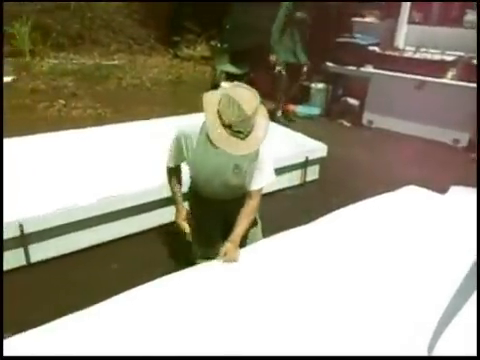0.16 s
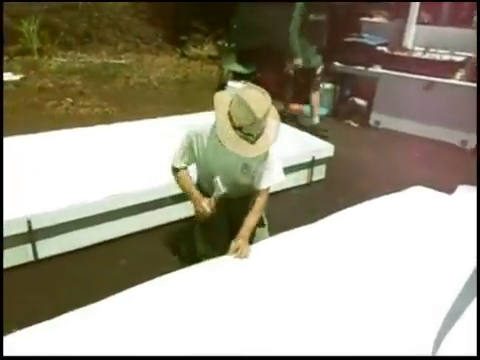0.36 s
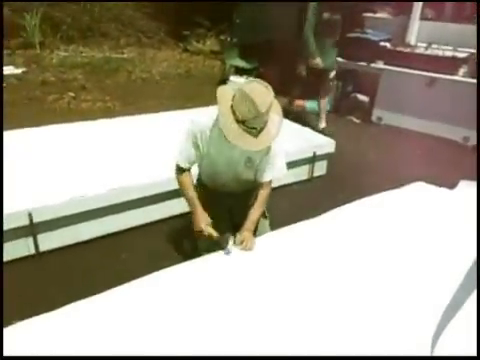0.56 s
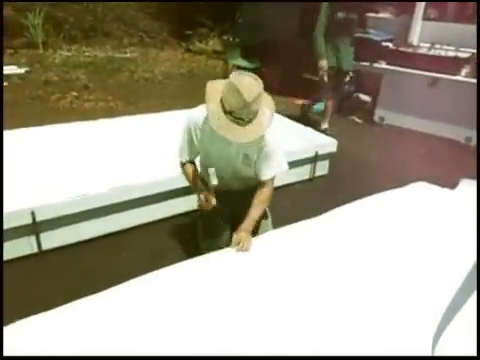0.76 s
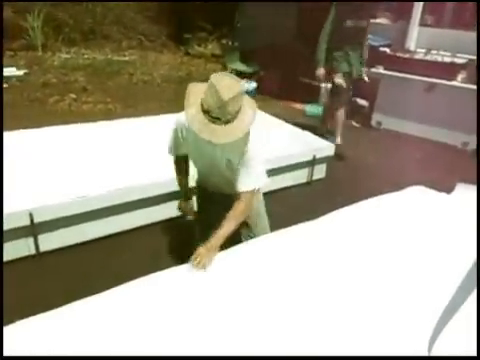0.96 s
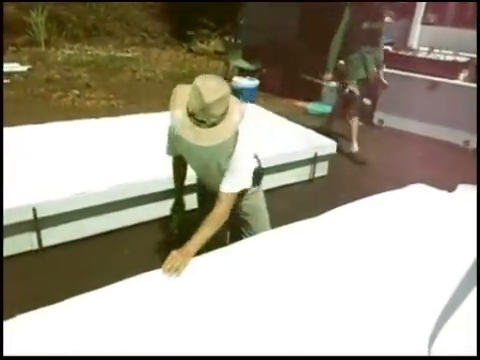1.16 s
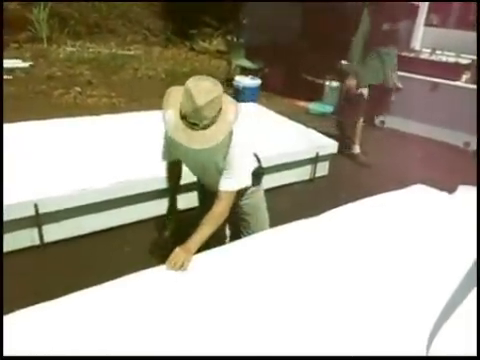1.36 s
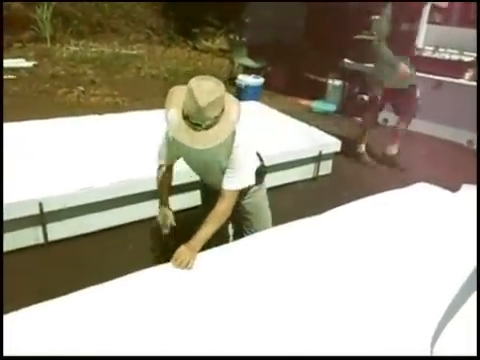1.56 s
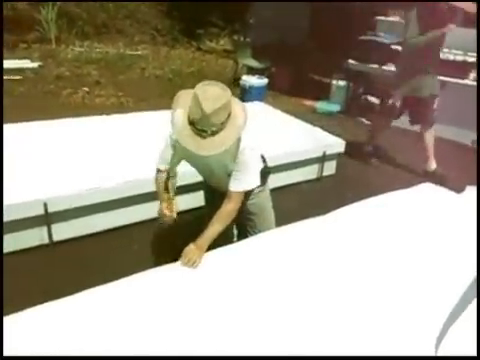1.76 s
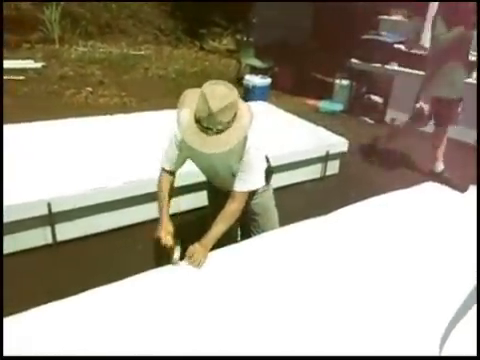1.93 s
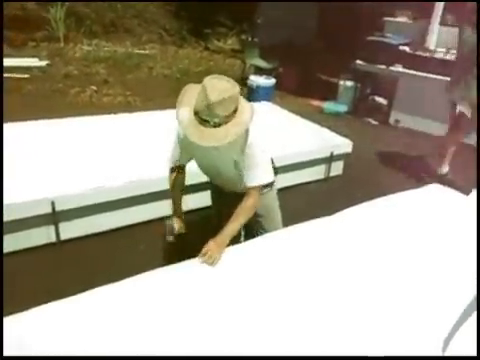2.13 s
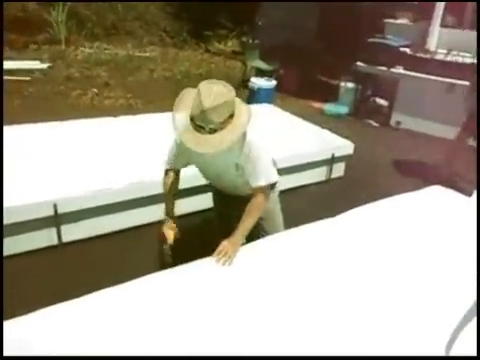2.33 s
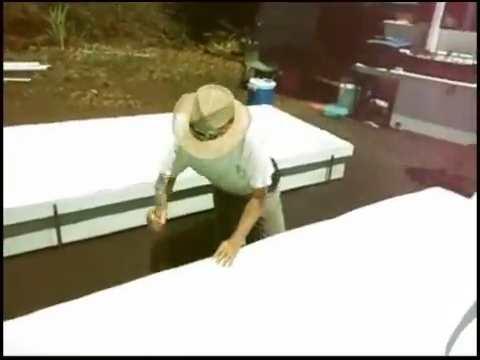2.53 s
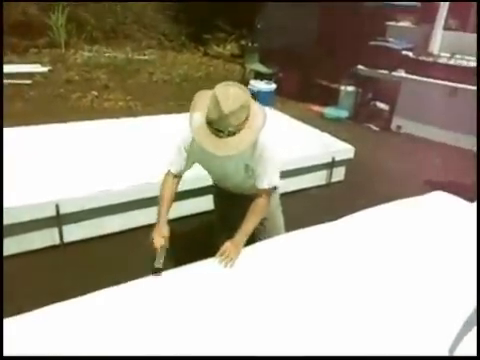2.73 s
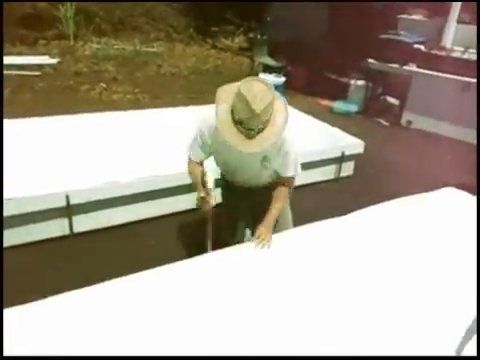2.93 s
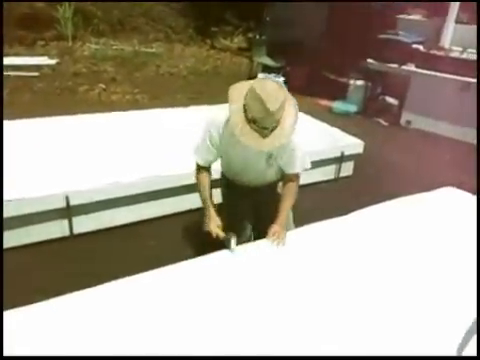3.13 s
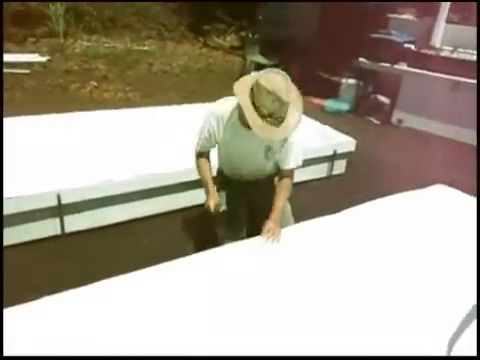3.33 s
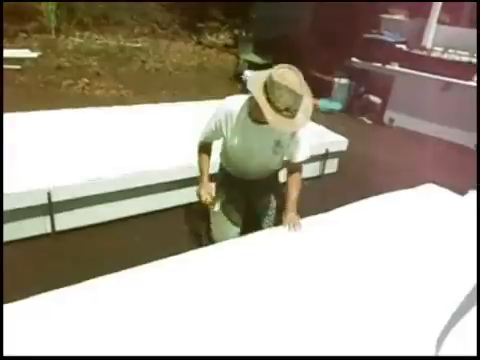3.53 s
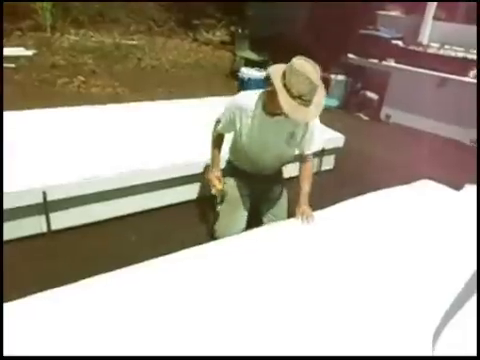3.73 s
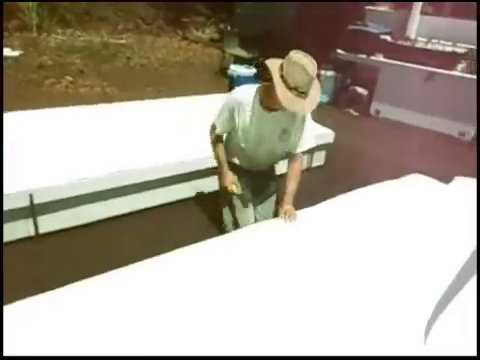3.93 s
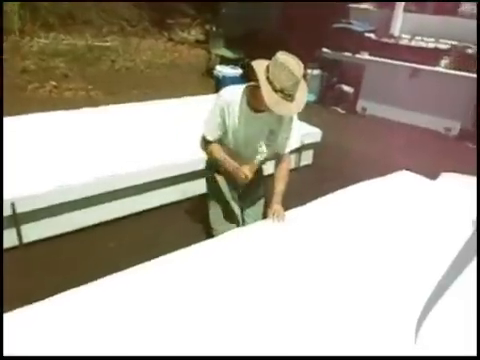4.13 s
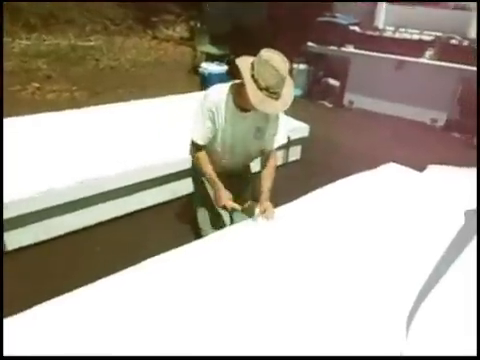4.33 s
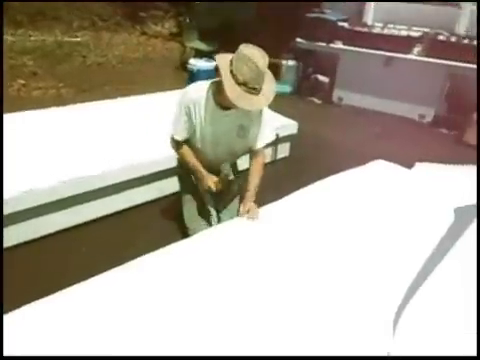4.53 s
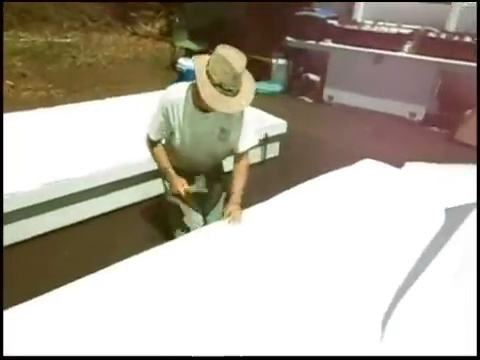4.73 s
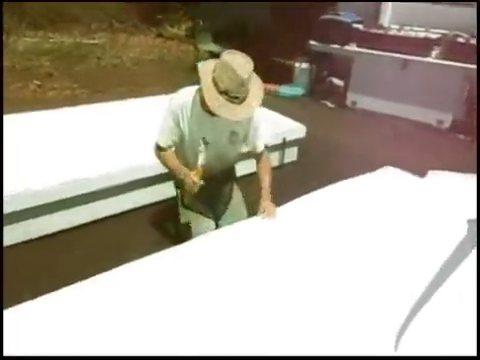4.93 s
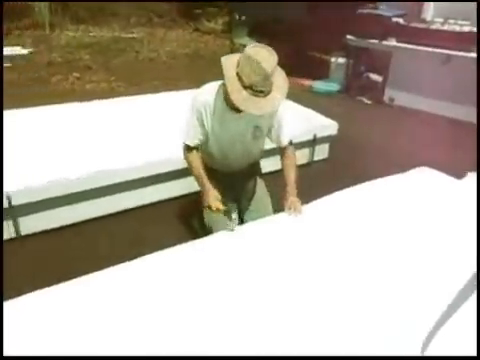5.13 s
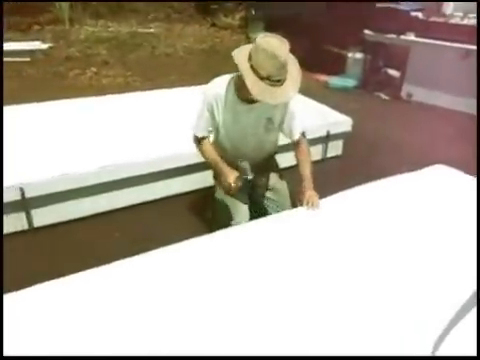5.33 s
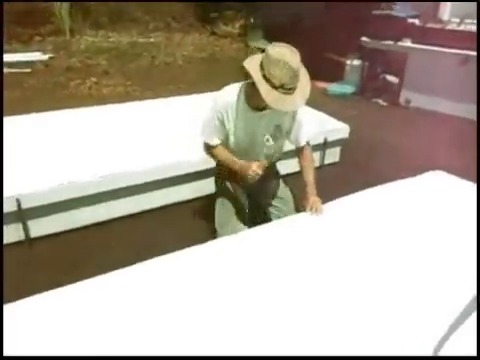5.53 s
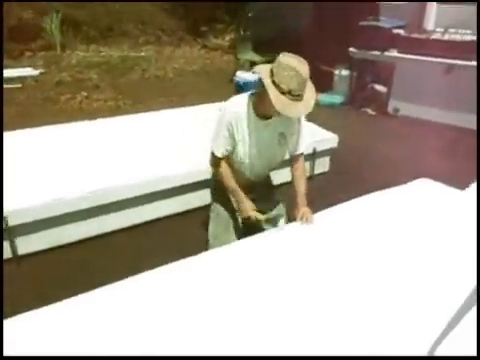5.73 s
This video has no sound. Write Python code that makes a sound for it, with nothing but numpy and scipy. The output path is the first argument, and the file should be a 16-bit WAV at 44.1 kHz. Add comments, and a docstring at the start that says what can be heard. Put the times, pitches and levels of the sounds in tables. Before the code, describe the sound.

In an open yard, gusty wind rumbles on a small, narrow-sounding microphone over a faint hiss. A staple gun fires six unevenly spaced shots through plastic sheeting into a wooden edge. Each is a sharp crack with a brief steel ring and a wooden thump, followed by a smaller spring clack. Between shots, loose metal parts tick and the sheet rustles faintly. Two short rasps come near the end.

```python
"""Wind buffets a small, narrow-band microphone in an open yard, over a faint hiss.
A staple gun then fires six times through plastic sheeting into a wooden edge.
Each shot: the driver cracks, the steel rings, the wood thumps; a smaller clack as the tool springs back.
Between shots, loose metal parts tick and the sheet rustles.
Two short swelling rasps: the tool rattles into a spring clack; the sheet slides before the last shot."""
import sys
import numpy as np
from scipy import signal
from scipy.fft import rfft, irfft
from scipy.io import wavfile
from scipy.ndimage import uniform_filter1d

SR = 44100
rng = np.random.default_rng(int(sys.argv[2]) if len(sys.argv) > 2 else 0)


def pcm_store(signal):
    """Save signal as 16-bit PCM."""
    levels = np.round(np.clip(np.atleast_2d(signal), -1, 1) * 32767)
    wavfile.write(sys.argv[1], SR, levels.astype(np.int16).T)


N = 254898

# Noise spectra (frequency [Hz], relative density [dB])
AIR_SPECTRUM = [(25, -0.5), (60, -8.5), (130, -7), (270, -0.5), (350, 3.5), (480, -1.5), (600, -2.5),
                (950, -4), (1400, -10.5), (2600, -14), (4000, -8.5), (5200, -13), (6400, -23), (7200, -44),
                (9000, -65)]
RUSTLE_SPECTRUM = [(200, -35), (700, 2.5), (1400, -3), (2600, 0.5), (4200, 0), (5500, -8), (7000, -19.5),
                   (9000, -35)]
WIND_SPECTRUM = [(30, -32), (60, -37.5), (100, -8), (135, 3.5), (210, 4), (300, 1.5), (420, -13.5),
                 (600, -21), (900, -40.5), (1500, -91)]
RASP_SPECTRUM = [(300, -11), (900, -2.5), (1500, -3), (2700, -1.5), (4200, -3), (5500, -11.5),
                 (7000, -19.5), (9000, -35)]
SOFT_CONTACT_SPECTRUM = [(800, -21), (2500, 6.5), (6500, -3), (8500, -22)]
CLICK_SPECTRUM = [(300, -6.5), (1200, -2.5), (4000, -23), (7000, -5), (12000, 1.5)]
CHATTER_SPECTRUM = [(150, -6), (500, -3.5), (1100, -3.5), (1800, -3), (2500, 3.5), (3200, 0.5), (4300, -3),
                    (5500, -16), (7000, -18), (9000, -33.5)]
CRACK_SPECTRUM = [(100, -30.5), (300, -22), (520, 6), (800, 3), (1150, 7), (1600, 0), (2000, 1.5),
                  (2500, 1.5), (3400, -1.5), (4800, -6), (5600, -11.5), (6600, -17), (7500, -19),
                  (9000, -33)]
YARD_TAIL_SPECTRUM = [(150, -2), (500, 7), (1200, -2), (2600, 1.5), (4200, -1), (5500, -6), (7000, -17.5),
                      (9000, -29.5)]

# Contour driving yard hiss and sheet rustle (time [s], relative level [dB])
BACKGROUND_SWELL = [(0.0, -58), (0.61, -50), (1.17, -64.5), (1.22, -59.5), (1.44, -66), (2.05, -53),
                    (2.34, -56.5), (2.55, -69.1), (3.12, -55), (4.05, -57.5), (4.23, -62.5), (4.33, -56),
                    (4.5, -53.5), (5.77, -60)]
# Wind strength (time [s], level [dB])
WIND_STRENGTH = [(0.0, -61), (0.09, -36.5), (0.46, -39), (0.62, -31), (0.76, -35), (0.81, -40.5),
                 (1.42, -41.5), (1.49, -33), (2.81, -32.5), (3.12, -50), (3.4, -31.5), (3.72, -57.5),
                 (4.23, -60.5), (4.66, -39), (4.91, -54.8), (4.96, -34), (5.1, -37), (5.15, -43.5),
                 (5.22, -40), (5.62, -57), (5.67, -39.5), (5.77, -50)]
# Strongest eddies (centre time [s], peak [dB], nominal pitch [Hz])
STRONG_EDDIES = [(0.091, -18.5, 250), (0.103, -20.5, 195), (0.42, -16, 285), (0.445, -18, 287),
                 (0.52, -20, 230), (0.612, -15.5, 290), (0.773, -22.5, 233), (0.958, -15, 264),
                 (0.974, -19, 215), (1.207, -19.5, 196), (1.341, -31.5, 333), (1.626, -26, 450),
                 (1.632, -18.5, 242), (1.771, -16, 332), (1.78, -13, 265), (1.841, -18.5, 304),
                 (1.871, -16, 323), (1.928, -24, 392), (1.932, -13.5, 199), (2.13, -16, 235),
                 (2.19, -18.5, 200), (2.213, -16.5, 220), (2.444, -21.5, 346), (2.699, -18, 292),
                 (2.872, -19.5, 218), (3.028, -19, 232), (3.142, -19.5, 201), (3.497, -19.5, 265),
                 (4.683, -15, 186), (4.958, -27.5, 206), (4.985, -24, 220)]
# Rasps: tool rattle, then sheet slide (loudest time [s], level [dB], swell [s])
RASPS = [(4.484, -36, .03), (5.125, -35, .068)]
# Resonances of the loose parts (frequency [Hz], width [Hz], relative level [dB])
LOOSE_RESONANCES = [(2836, 220, -3), (4660, 460, 4.5), (4810, 140, -8), (5870, 260, -4)]
# Loose parts touch (time [s], peak [dB])
TICKS = [(0.5212, -40.5), (1.043, -38.5), (1.674, -47.5), (1.863, -36.5), (2.3293, -42.5), (2.6513, -48),
         (2.9717, -37), (3.094, -33.5), (3.708, -44), (4.3095, -41.5), (4.712, -42), (4.7654, -38),
         (5.3493, -41), (5.4918, -45.5), (5.665, -40.5)]
# Modes of tool and wooden edge (base frequency [Hz], relative level [dB], t60 before envelope [s])
STEEL_MODES = [(1630, -9.5, 0.032), (1720, -1.5, 0.057), (2390, -1, 0.075), (2528, 11, 0.029),
               (2850, -12, 0.061), (3055, 1.5, 0.047), (3350, -27, 0.038), (4220, -11.5, 0.13),
               (4130, -25, 0.041), (4950, 8, 0.029)]
WOOD_MODES = [(131.3, -19.5, 0.29), (198.8, -11, 0.26), (259, -8.5, 0.13), (310.8, -1, 0.099),
              (368, -17.5, 0.15), (452.6, -20, 0.17), (649, -12.5, 0.069), (1360, -16, 0.018)]
# Spring returns (time [s], level [dB], rise [s], click level [dB], low ring [Hz], high ring [Hz])
CLACKS = [(0.698, -24, 0.014, -51, 2710, 3120), (2.046, -37.5, .01, -54, 2470, 2730),
          (2.837, -35, 0.0023, -31, 1237, 2350), (3.293, -31, 0.015, -36, 1930, 2350),
          (4.4985, -29, 0.0019, -24, 2710, 3940), (5.228, -27, 0.0013, -23.5, 1730, 2485)]
# Staples; each spot on the edge has its own two knock pitches (time [s], level [dB], crack tilt [dB/oct],
# thump level [dB], wood pitch [ratio], low knock [Hz], high knock [Hz], knock level [dB])
SHOTS = [(0.6446, -15.5, 0.5, -7, 1.07, 1117, 1893, -22), (1.9805, -15, 0, -5.5, 0.99, 817, 1077, -14),
         (2.7671, -16.5, 0.5, -5, 1.024, 794, 1250, -15), (3.2410, -16, -0.7, -7, 1.017, 1298, 1804, -19.5),
         (4.4298, -15.5, 0.5, -7.5, 1.0, 979, 1270, -22), (5.165, -15.5, 1, -5, 1.04, 1088, 1602, -18)]


def amp(db):
    """Decibels to gain."""
    return 10 ** (np.asarray(db) / 20)


def unit_rms(x):
    """Scale to rms 1."""
    return x / np.sqrt(np.mean(x ** 2) + 1e-20)


def curve(rows):
    """Linear interpolation of (time [s], value) rows."""
    return np.interp(np.arange(N) / SR, *np.transpose(rows))


def add(mix, start_s, sound):
    """Mix a sound in at start_s."""
    part = mix[max(round(start_s * SR), 0):][:len(sound)]
    part += sound[:len(part)]


def noise(spectrum, size, tilt_db_oct=0):
    """Random-phase noise of a given spectrum, rms 1."""
    octave = np.log2(np.fft.rfftfreq(size, 1 / SR) + 1)
    hz, db = np.transpose(spectrum)
    gain = amp(np.interp(octave, np.log2(hz), db) + tilt_db_oct * octave)
    return unit_rms(irfft(gain * np.exp(2j * np.pi * rng.random(len(gain))), size))


def wander(rate_hz):
    """Low-passed random drift, rms 1."""
    hz = np.fft.rfftfreq(N, 1 / SR)
    return unit_rms(irfft(rfft(rng.standard_normal(N)) * np.exp(-(hz / rate_hz) ** 2), N))


def patchy(x, depth_db):
    """Colour drift in patches of about 600 Hz by 0.14 s."""
    frames = signal.stft(x, nperseg=512)[2]
    field = uniform_filter1d(rng.standard_normal(frames.shape), size=7, axis=0)
    field = uniform_filter1d(field, size=24, axis=1)
    return unit_rms(signal.istft(frames * amp(depth_db * unit_rms(field)))[1][:N])


def ragged(x, peak_db, spacing_hz=110):
    """Many close resonances: random spectral peaks and deeper dips."""
    hz = np.fft.rfftfreq(len(x), 1 / SR)
    knots_hz = np.arange(0, SR, spacing_hz)
    ripple_db = peak_db * np.interp(hz, knots_hz, rng.uniform(-2.8, 1, len(knots_hz)))
    return unit_rms(irfft(rfft(x) * amp(ripple_db), len(x)))


def ring(modes, t, pitch=1):
    """Struck body: decaying sines from (frequency [Hz], level [dB], t60 [s]) rows."""
    return sum(amp(db - 60 * t / t60_s) * np.sin(2 * np.pi * (hz * pitch * t + rng.random()))
               for hz, db, t60_s in modes)


def envelope(t, rise_s, hold_s, t60_s):
    """Linear rise; exponential decay from t = hold_s."""
    return np.clip(t / rise_s, 0, 1) * amp(-60 * np.maximum(t - hold_s, 0) / t60_s)


def yard_air(swell_db):
    """Distant hiss of the yard, drifting in level and colour."""
    level_db = -57.5 + 0.5 * swell_db + 0.5 * wander(rate_hz=4)
    return amp(level_db) * patchy(noise(AIR_SPECTRUM, N), depth_db=2)


def sheet_rustle(swell_db):
    """The plastic rustles unevenly and shivers after each shot."""
    t = np.arange(N) / SR
    shiver = sum(amp(db - 36) * envelope(t - time_s, rise_s=0.01, hold_s=0.024, t60_s=0.36)
                 for time_s, db, *_ in SHOTS)
    stir = np.hypot(amp(-62.5 + 1.44 * swell_db), shiver)
    flicker = amp(2.1 * wander(rate_hz=160))
    return stir * flicker * patchy(noise(RUSTLE_SPECTRUM, N), depth_db=2)


def wind_rumble(puff_db=-17.5, puff_half_width_s=0.02):
    """Lumpy turbulence, puffing up around each strong eddy; stronger gusts reach higher in pitch."""
    t = np.arange(N) / SR
    puff_power = sum(amp(db + puff_db) ** 2 * np.exp(-((t - time_s) / puff_half_width_s) ** 2)
                     for time_s, db, _ in STRONG_EDDIES)
    power = amp(curve(WIND_STRENGTH)) ** 2 + puff_power
    level_db = 10 * np.log10(power) - 1 + 2.45 * wander(rate_hz=52)
    bright_share = np.clip((level_db + 39.5) / 16, 0, 1)
    dull = np.sqrt(1 - bright_share) * noise(WIND_SPECTRUM, N, tilt_db_oct=-6.5)
    bright = np.sqrt(bright_share) * noise(WIND_SPECTRUM, N, tilt_db_oct=4)
    return amp(level_db) * (dull + bright)


def small_eddies(rate_per_s=14, centre_hz=267, spread_oct=0.25):
    """Random eddies, scaled by the wind that carries them; columns as STRONG_EDDIES."""
    gap, size, pitch = rng.standard_normal((3, 2000))
    elapsed = np.cumsum(abs(gap))
    time_s = elapsed / elapsed[-1] * len(gap) / rate_per_s
    peak_db = np.interp(time_s, *np.transpose(WIND_STRENGTH)) + 7 + 0.45 * size
    hz = centre_hz * 2 ** (spread_oct * np.clip(pitch, -2, 2))
    return np.transpose([time_s, peak_db, hz])[time_s < N / SR]


def eddy_buffets():
    """One brief push per eddy; the microphone passes no deep bass, so it swings back."""
    out, t = np.zeros(N), np.arange(-SR // 30, SR // 30) / SR
    lead_s = len(t) / (2 * SR) + 0.001
    for time_s, peak_db, hz in [*STRONG_EDDIES, *small_eddies()]:
        push = rng.choice([-1, 1]) / (1 + (hz * t / 0.32) ** 2)
        swing = signal.sosfilt(signal.butter(5, 0.8 * hz, "highpass", fs=SR, output="sos"), push)
        add(out, time_s - lead_s, amp(peak_db) * swing / abs(swing).max())
    return out


def rasps(growth_db=15):
    """Short swelling rasps: the tool rattles into a spring clack; the sheet slides before the last shot."""
    out, t = np.zeros(N), np.arange(SR // 3) / SR
    for time_s, db, swell_s in RASPS:
        growth = amp(growth_db * np.minimum(t / swell_s - 1, 0))
        rasp = noise(RASP_SPECTRUM, len(t)) * envelope(t, rise_s=0.006, hold_s=swell_s, t60_s=0.14)
        add(out, time_s - swell_s, amp(db) * growth * rasp)
    return out


def tool_ticks(scatter_db=3):
    """Loose metal parts rattle in broad resonances, in a new mixture at each touch."""
    out, t = np.zeros(N), np.arange(SR // 6) / SR
    hz = np.fft.rfftfreq(len(t), 1 / SR)
    for time_s, peak_db in TICKS:
        body = sum(amp(db + scatter_db * rng.standard_normal()) / (1 + 2j * (hz - centre_hz) / width_hz)
                   for centre_hz, width_hz, db in LOOSE_RESONANCES)
        rattle = irfft(body * rfft(noise(SOFT_CONTACT_SPECTRUM, len(t))), len(t))
        rattle *= envelope(t, rise_s=0.0011, hold_s=0.0016, t60_s=0.06)
        add(out, time_s, amp(peak_db) * rattle / abs(rattle).max())
    return out


def spring_clacks():
    """The spring throws the driver back: click, chatter, ringing parts and a bump on the wood."""
    out, t = np.zeros(N), np.arange(SR // 3) / SR
    for time_s, db, rise_s, click_db, low_hz, high_hz in CLACKS:
        chatter = ragged(noise(CHATTER_SPECTRUM, len(t)), peak_db=2)
        chatter *= envelope(t, rise_s, hold_s=0.0028, t60_s=0.13)
        steel = ring(STEEL_MODES, t) * envelope(t, rise_s, hold_s=0.02, t60_s=1.5)
        parts = ring([(low_hz, -1, 0.13), (high_hz, 0, 0.14)], t)
        parts *= envelope(t, rise_s=0.011, hold_s=0.03, t60_s=1.5)
        bump = ring(WOOD_MODES, t) * envelope(t, rise_s=0.014, hold_s=0.03, t60_s=0.58)
        click = noise(CLICK_SPECTRUM, len(t)) * envelope(t, rise_s=0.0003, hold_s=0.00074, t60_s=0.021)
        clack = chatter + amp(-10.5) * steel + amp(-6.5) * parts + amp(9) * bump
        add(out, time_s, amp(db) * clack + amp(click_db) * click)
    return out


def staple_shots(wood_lag_s=0.00515):
    """The driver snaps and cracks, steel rings, the yard answers; the heavy wood swings up later."""
    out, t = np.zeros(N), np.arange(SR // 2) / SR
    for time_s, db, tilt_db_oct, thump_db, wood_pitch, low_hz, high_hz, knock_db in SHOTS:
        crack = ragged(noise(CRACK_SPECTRUM, len(t), tilt_db_oct), peak_db=4.5)
        crack *= envelope(t, rise_s=0.0011, hold_s=0.0066, t60_s=0.092)
        steel = ring(STEEL_MODES, t) * envelope(t, rise_s=0.00092, hold_s=0.01, t60_s=1.5)
        yard = noise(YARD_TAIL_SPECTRUM, len(t)) * envelope(t, rise_s=0.017, hold_s=0.02, t60_s=0.57)
        snap = noise(CLICK_SPECTRUM, len(t)) * envelope(t, rise_s=0.00036, hold_s=0.002, t60_s=0.036)
        shot = amp(-2.18) * crack + amp(-17.5) * (snap + steel) + amp(-21.5) * yard
        knock = ring([(low_hz, 0, 0.075), (high_hz, -2, 0.065)], t)
        knock *= envelope(t, rise_s=0.0083, hold_s=0.034, t60_s=0.46)
        thump = ring(WOOD_MODES, t, wood_pitch) * envelope(t, rise_s=0.0096, hold_s=0.031, t60_s=1.0)
        add(out, time_s, amp(db) * shot + amp(knock_db) * knock)
        add(out, time_s + wood_lag_s, amp(thump_db) * thump)
    return out


def scene():
    """All sources at one microphone."""
    stapling = staple_shots() + spring_clacks() + tool_ticks() + rasps()
    wind = wind_rumble() + eddy_buffets()
    swell_db = curve(BACKGROUND_SWELL)
    swell_db -= swell_db.mean()
    return (stapling + wind + yard_air(swell_db) + sheet_rustle(swell_db))[None]


def record(dry):
    """Microphone: thin bass, rounded peaks, a narrow band; faint treble reaches on above it to about 12 kHz."""
    low_cut_hz, edge_hz, leak_hz = 70, 7000, 11900
    ceiling_db, leak_db = -4.5, -23
    thin = signal.sosfilt(signal.butter(2, low_cut_hz, "highpass", fs=SR, output="sos"), dry)
    rounded = thin / (1 + (thin / amp(ceiling_db)) ** 4) ** (1 / 4)
    band, leak = (signal.firwin(221, hz, window=("kaiser", 7), fs=SR) for hz in (edge_hz, leak_hz))
    return signal.oaconvolve(rounded, (band + amp(leak_db) * leak)[None], "same")


dry = scene()
out = record(dry)
pcm_store(out)
```